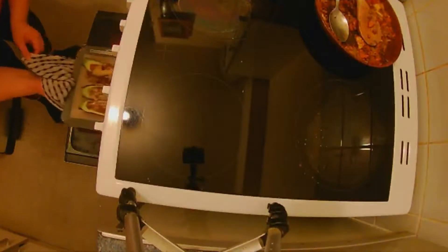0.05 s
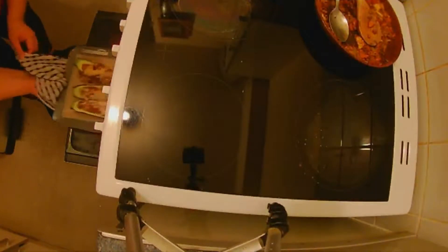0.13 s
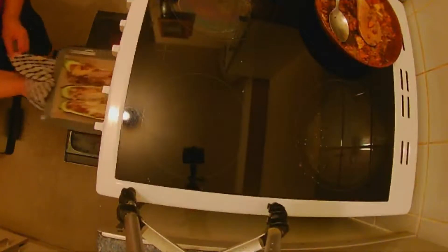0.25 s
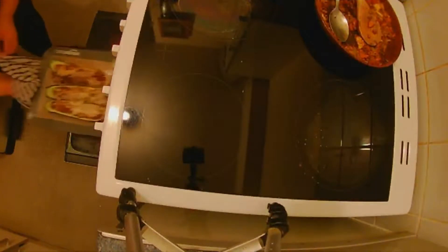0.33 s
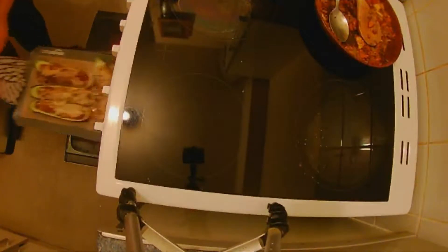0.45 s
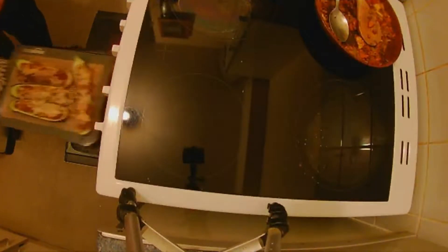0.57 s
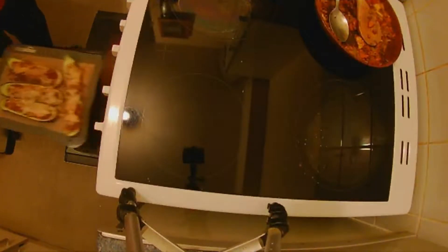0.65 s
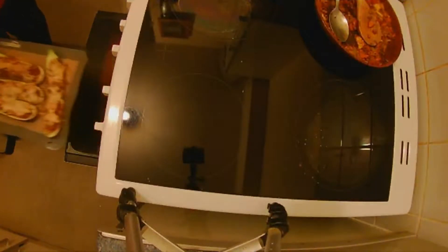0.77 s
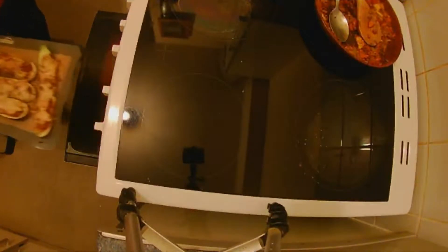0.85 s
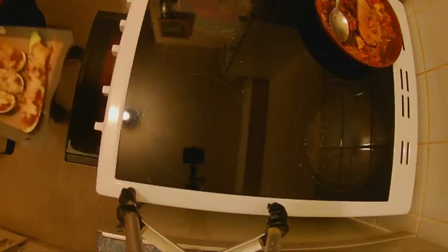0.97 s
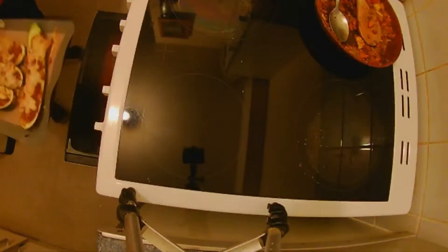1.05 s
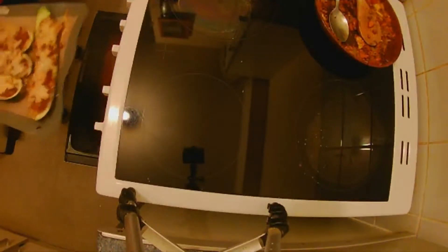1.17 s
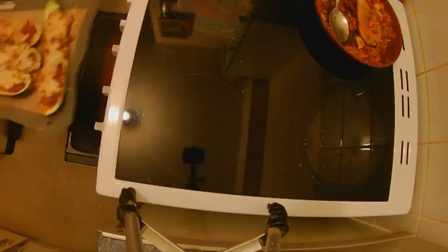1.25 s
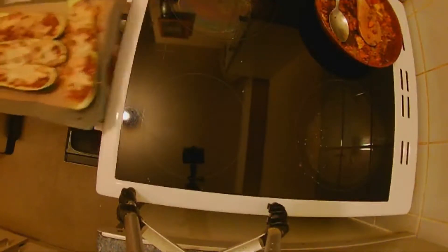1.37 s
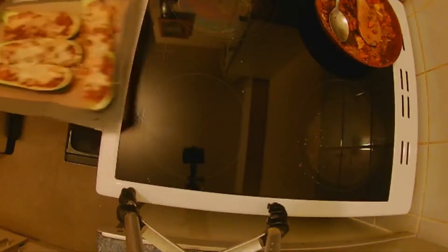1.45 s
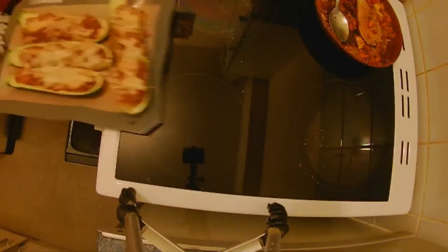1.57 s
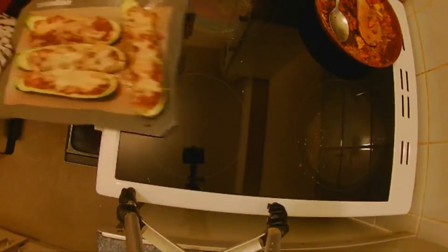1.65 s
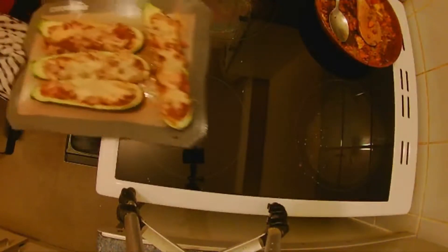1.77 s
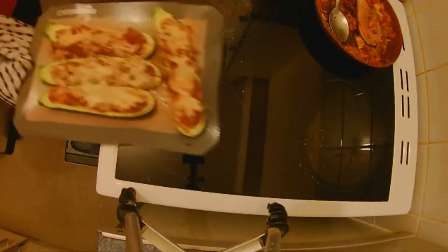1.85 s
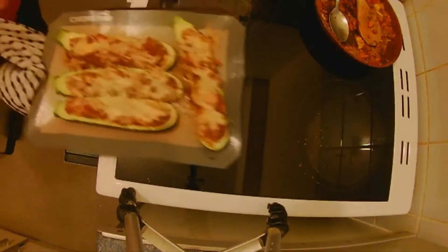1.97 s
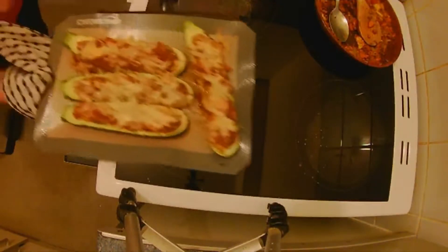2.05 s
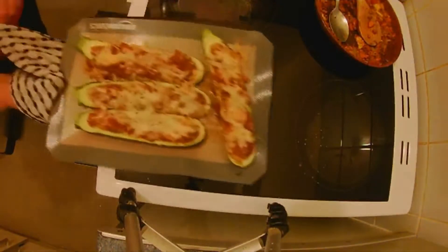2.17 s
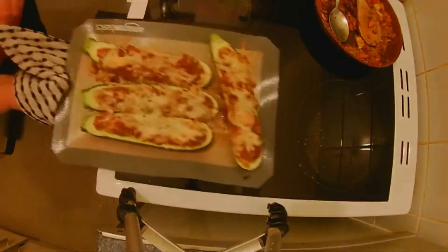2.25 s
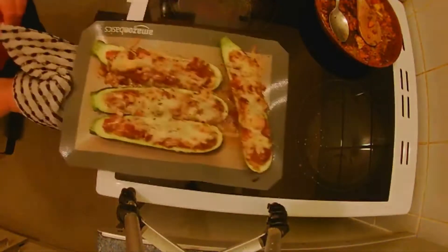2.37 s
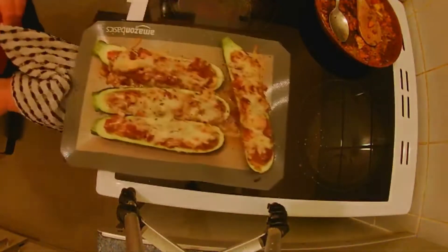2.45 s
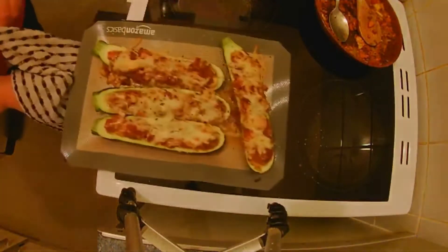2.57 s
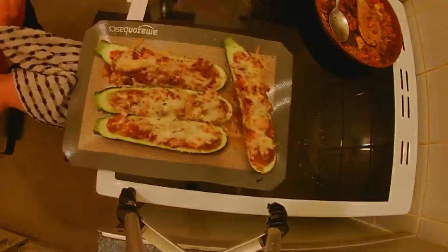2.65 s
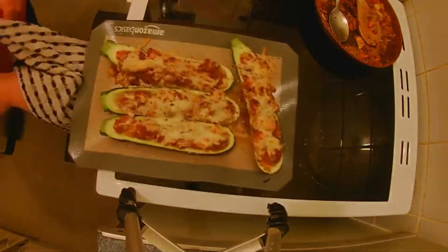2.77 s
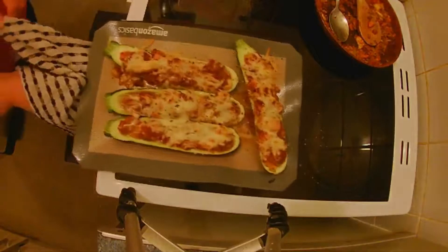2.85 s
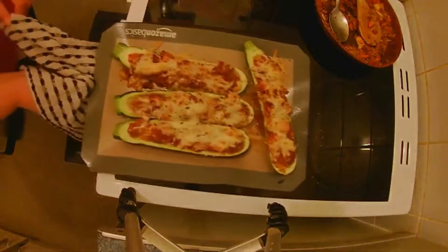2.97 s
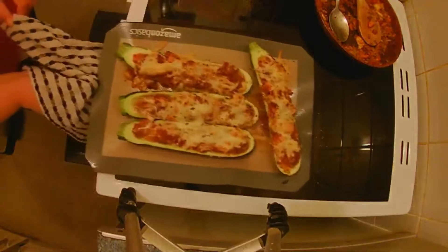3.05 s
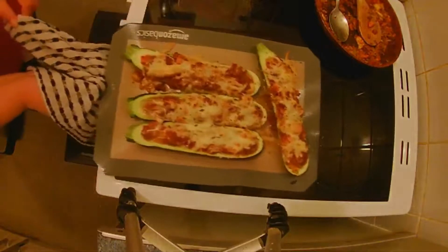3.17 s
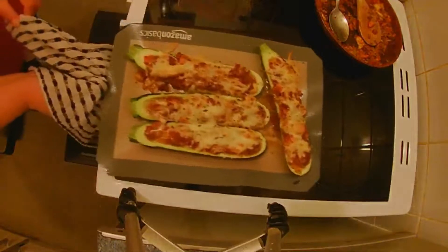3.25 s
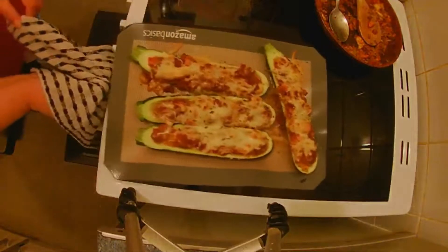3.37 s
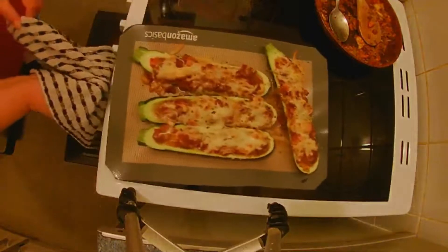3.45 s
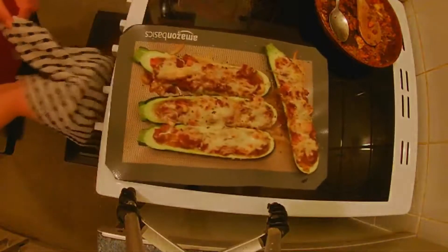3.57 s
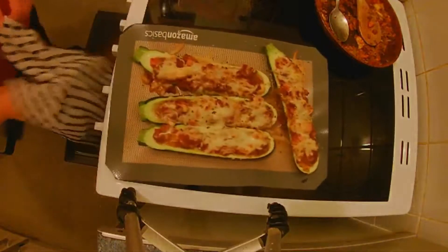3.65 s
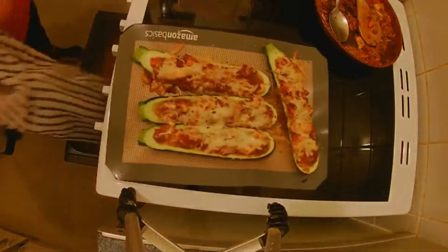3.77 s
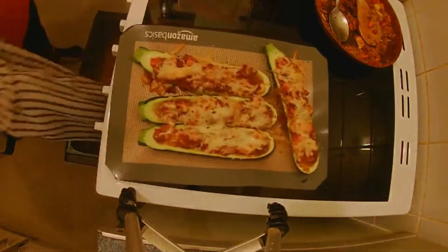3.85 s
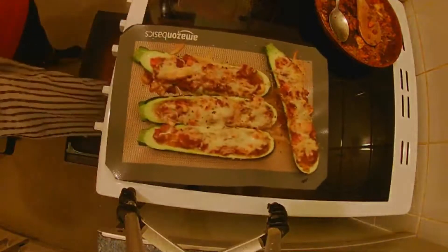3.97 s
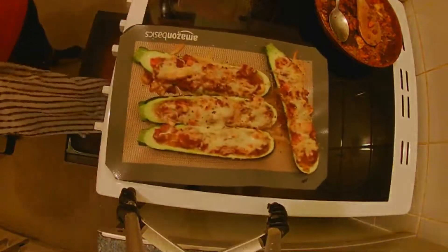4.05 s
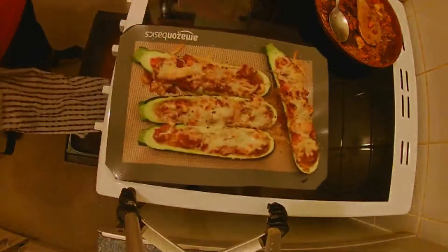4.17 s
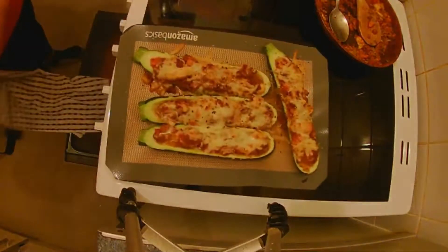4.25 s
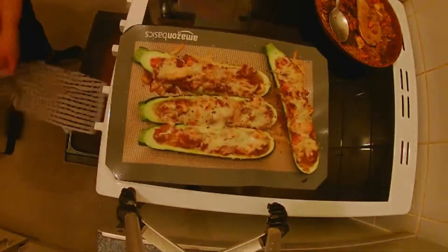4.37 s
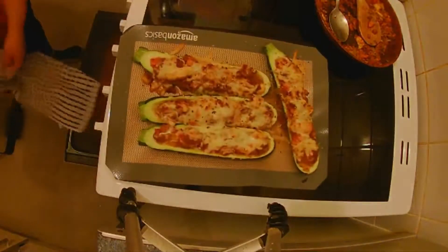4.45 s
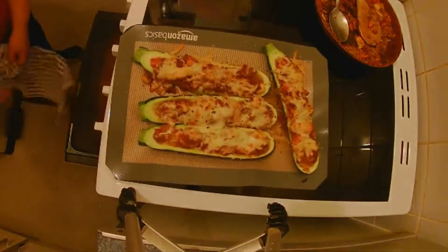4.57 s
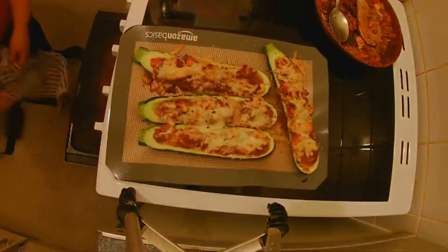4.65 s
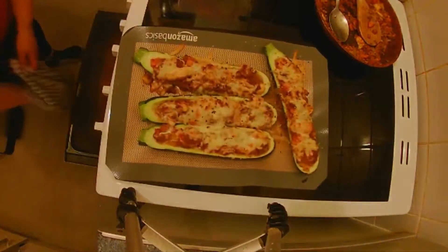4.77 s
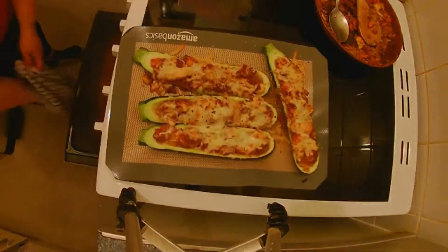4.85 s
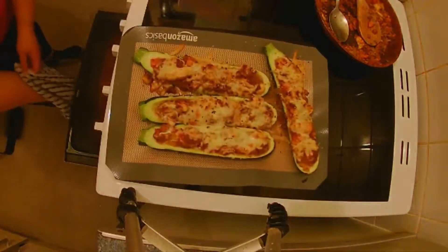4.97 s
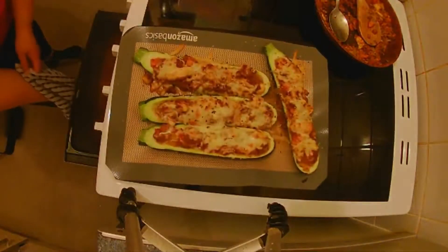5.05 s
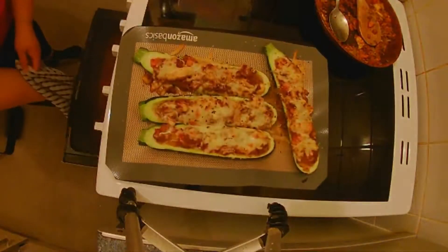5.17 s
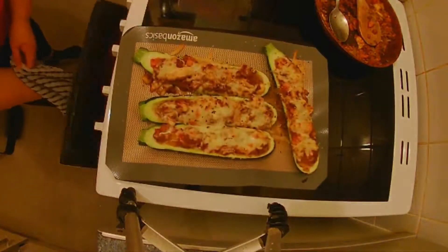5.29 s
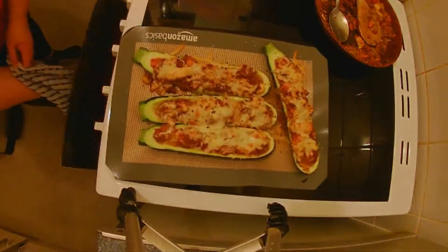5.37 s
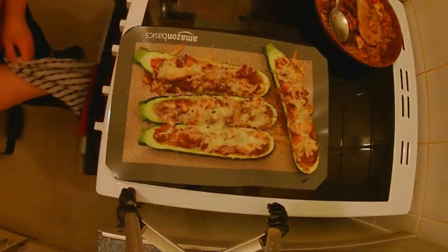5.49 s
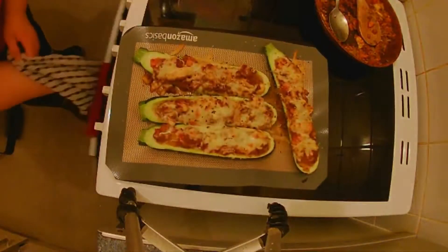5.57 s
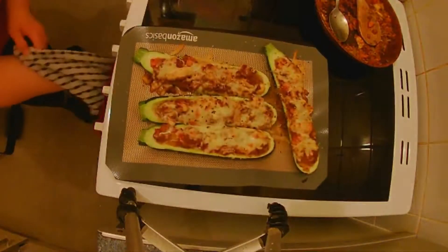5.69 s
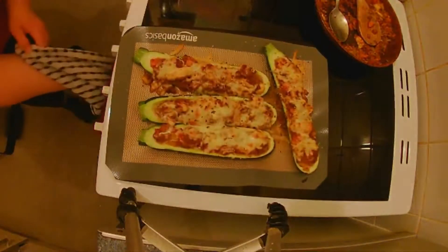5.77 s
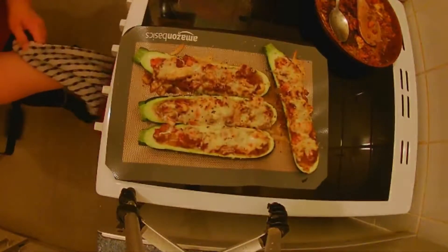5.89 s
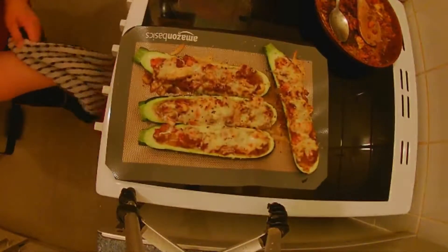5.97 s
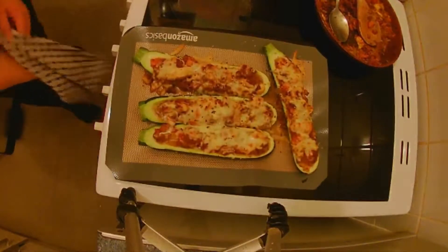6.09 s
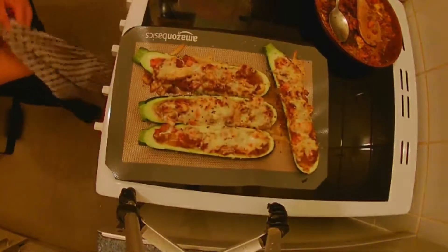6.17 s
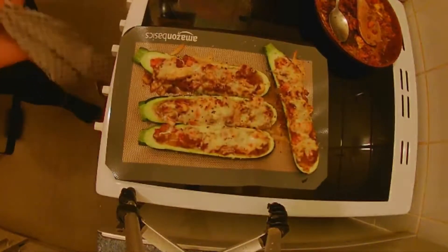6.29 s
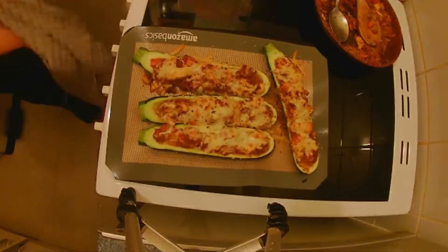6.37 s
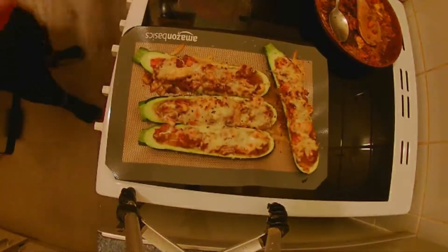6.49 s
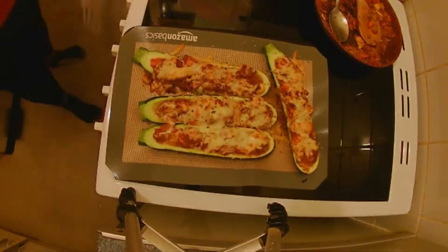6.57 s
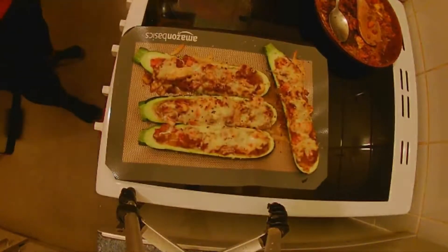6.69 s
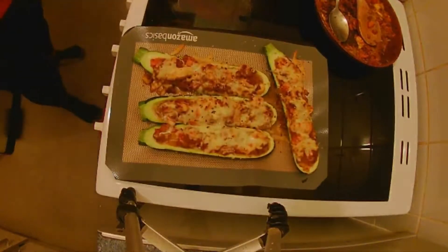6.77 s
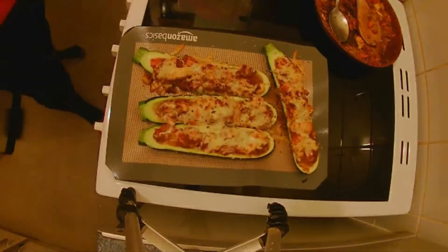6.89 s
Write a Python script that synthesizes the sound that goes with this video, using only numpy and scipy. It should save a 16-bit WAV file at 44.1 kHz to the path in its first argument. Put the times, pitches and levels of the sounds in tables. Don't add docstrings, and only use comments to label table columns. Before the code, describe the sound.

A small tiled kitchen, heard close to the cooker. Oven fan noise and low mains hum continue throughout, with a soft hiss of hot food and a faint clock tick about once a second from 0.16 s. Tiny fat spits crackle in the first half second and near 1.3-1.4 s, sparsely later. At 1.63 s a loaded steel tray strikes the glass sharply; its rim rings as it scrapes with two gritty strokes from 1.7 to 2.1 s. Several knocks cluster at 2.14-2.38 s, strongest around 2.29 s, with a low cooker thump. Light settling taps and rubs come at 3.1-3.24 s. The sheet snaps at 3.41 s, the loudest event, and pops more softly at 4.81 s. The oven catch clacks at 5.53 s, the door thuds shut at 5.79 s with a ringing, hollow boom, and the rack rattles until 6.1 s. Fan and hum remain, with hiss rising slightly at the end.

```python
import sys
import numpy as np
from scipy import signal
from scipy.fft import rfft, irfft, next_fast_len
from scipy.io import wavfile
from scipy.ndimage import uniform_filter1d, map_coordinates

SR = 44100
rng = np.random.default_rng(int(sys.argv[2]) if len(sys.argv) > 2 else 0)


def how_loud(loudness_db):
    steps = np.asarray(loudness_db, float) / 20
    return 10 ** steps


def generate_wav(sig):
    pcm = np.round(np.clip(np.atleast_2d(sig).T, -1, 1) * 32767).astype(np.int16)
    wavfile.write(sys.argv[1], SR, pcm)


N = 305588

# start in seconds, peak in dB, weight in dB, bite in dB.
KNOCKS = [(1.631, -40, 9, -5), (1.634, -11, 0, -1), (1.709, -26, 13, 4), (1.912, -31, 4, 4),
          (2.138, -32.5, 7, 13), (2.185, -24, 6.5, -20), (2.225, -29, -7, -12), (2.282, -21, -30, 11.5),
          (2.293, -13, 0, -9.5), (2.312, -33, -18, -1), (2.376, -27, 9.5, -9), (3.098, -21.5, -3.5, -10),
          (3.117, -34, -11, -9), (3.198, -40.5, -18, -9), (3.236, -37.5, 5, -12)]
# start in seconds, peak in dB, weight in dB, bite in dB.
POPS = [
    (3.414, -5.5, 3, -2),
    (4.8125, -11, 2.5, 2.5),
]
# start in seconds, peak in dB, weight in dB, bite in dB.
LATCH = [
    (5.534, -19.5, 1, 8),
    (5.542, -24, -3.5, -5),
    (5.559, -24.5, 2, 7),
    (5.589, -31, -1, -5),
    (5.617, -36.5, -4, -25),
]
# start in seconds, peak in dB, weight in dB, bite in dB.
SLAM = [
    (5.79, -19.5, -14, 2.5),
    (5.794, -16, 1.5, 0.5),
    (5.831, -23.5, 8.5, -14),
    (5.861, -33, -3, -13),
]
# start in seconds, peak in dB, weight in dB, bite in dB.
RATTLE = [
    (5.924, -31.5, 9, -15),
    (5.957, -46, 4, -14),
    (5.999, -33, 9, -25),
    (6.033, -46, 2, -10),
    (6.0615, -44, -8, 40),
    (6.074, -35.5, -1, -1),
]
# start in seconds, peak in dB.
RIM_CATCHES = [
    (1.7098, -24),
    (1.9112, -46),
    (2.1862, -32),
]
# start in seconds, peak in dB, bite in dB.
SPITS = [(0.0044, -48, -14), (0.1077, -49.5, -12), (0.3026, -48.5, 2), (0.4767, -46.5, 3), (0.4914, -49, 3),
         (0.5004, -52, 1), (0.5093, -48, 3), (1.2999, -55, -10), (1.3344, -54, 0), (1.441, -57.5, 0),
         (3.7244, -52, 0), (4.3844, -52, 1), (4.3994, -58, 1), (5.4, -56, 4), (4.6, -52, -2)]
TICKS_DB = [-46, -43.5, -46, -51, -45.5, -43, -45]

# start in seconds, length in seconds, rub in dB, weight in dB, bite in dB.
SLIDES = [
    (1.708, 0.22, -50.5, -1, 9),
    (1.918, 0.2, -45.5, 0.5, -1.5),
    (2.127, 0.036, -48.5, 6.5, 13),
    (2.193, 0.066, -50.5, -5, -3),
    (2.276, .006, -40, 1, 14),
    (2.305, 0.12, -53, -7, -3),
    (3.134, 0.075, -53, -11, 4),
    (3.221, 0.06, -56.5, 1, 0),
    (5.457, 0.024, -58.5, 9.5, -15),
]
# start in seconds, carcass boom in dB, pushed air in dB.
PUSHES = [
    (2.29, -41.5, -62),
    (2.37, -52, -58),
    (5.545, -47, -61),
    (5.66, -47, -62),
    (5.827, -39.5, -37.5),
]
# time in seconds, hiss in dB.
STEAM = [(0, -69), (.8, -72), (1.8, -70.5), (2.4, -71), (3.4, -81), (4.13, -75), (4.4, -64.5), (4.6, -72.5),
         (5.7, -81), (6.5, -87), (6.93, -64.5)]

# frequency in Hz, density in dB per Hz.
TRAY_COLOUR = [(47, -21.5), (80, -27), (283, -6.5), (1370, -1.5), (1530, 0.5), (1700, -2.5), (1900, -9),
               (2080, -13.5), (2840, -12.5), (3170, -17.5), (4050, -18), (7870, -36.5), (16000, -35.5)]
BUCKLE_COLOUR = [(47, -44), (80, -26), (242, -10.5), (538, -11.5), (760, -7), (1490, 3), (1740, -5.5),
                 (2130, -12), (2780, -13.5), (3240, -21.5), (4230, -22), (6450, -38.5), (16000, -56)]
CATCH_COLOUR = [(35, -49), (60, -38), (124, -9), (222, -1), (281, -9), (417, -2), (862, -7), (1380, 2.5),
                (1580, -6.5), (1860, -8), (3760, -20), (16000, -54)]
DOOR_COLOUR = [(35, -34), (60, -16), (153, -8.5), (233, -5.5), (882, -6), (1200, -0.5), (1380, -7),
               (1470, 3), (2520, -9.5), (3940, -8.5), (11500, -38.5), (16000, -93)]
RACK_COLOUR = [(300, -42), (700, -24), (1170, -2), (1600, -7), (2500, -20), (4500, -13.5), (8000, -32),
               (16000, -54)]
ESCAPEMENT_COLOUR = [(500, -16), (1200, 15), (1700, -0.5), (2300, 6), (3000, -3.5), (4000, 1.5),
                     (6000, -17), (16000, -53)]
SPIT_COLOUR = [(1000, -40), (3000, -1), (5000, 5), (8000, -7), (12000, -1), (16000, -14)]
FAN_COLOUR = [(15, -8.5), (45, 0), (110, -1.5), (280, -3), (420, -4.5), (560, -4), (900, -7), (1550, -8),
              (2000, -15.5), (3400, -21.5), (4100, -21), (7000, -27), (12000, -29.5), (16000, -35.5)]
# frequency in Hz, density in dB per Hz.
GLASS_COLOUR = [(120, -7.5), (295, -3.5), (380, -18), (465, -3.5), (620, -11.5), (1100, -3.5), (1350, 0),
                (1560, -4), (1780, -11.5), (2400, -14), (3400, -30), (4050, -18), (4700, -30.5),
                (7500, -34)]

# frequency in Hz, level in dB, t60 in seconds.
TRAY_RING = [(301, 2.5, 0.2), (475, 4, 0.13), (717, 0.5, 0.15), (938, 2.5, 0.066), (1080, -4, 0.13),
             (1280, -21, 0.088), (1518, 4.5, 0.042), (1625, -11.5, 0.16), (1790, -34, 0.051)]
BUCKLE_RING = [(934, -12, .09), (1118, -9, .08), (1245, -5, .06), (1382, -9, .06), (1443, -5, .06),
               (1537, -7, .06), (1692, -9, .07), (1766, -8, .08)]
CATCH_RING = [(125.7, -10.5, 0.51), (438, -5, 0.31), (469, 11, 0.087), (673, 0, 0.19), (773, -8.5, 0.26),
              (1118, 2, 0.18), (1330, 3.5, 0.27), (1880, -6, 0.22), (3770, -16.5, 0.28)]
DOOR_RING = [(171, -14.5, 0.19), (1165, -2, 0.19), (1231, -4, 0.26), (1520, -11, 0.19), (1820, -5, 0.27),
             (2356, -15, 0.16), (2656, -4.5, 0.22), (2910, -10, 0.13), (3090, 2, 0.14), (3380, -21, 0.14),
             (3868, -7, .24), (3980, -11, 0.13), (4220, -2, 0.064), (5185, -12, 0.18)]
RACK_RING = [(1200, 0, .028), (1050, -8, .03), (720, -8, .03)]
RIM_RING = [(1508, -0.5, 0.22), (1600, -2.5, 0.15), (1655, -4, 0.11)]
# frequency in Hz, t60 in seconds.
FADE = [(100, 0.5), (400, 0.25), (1400, 0.14), (4000, 0.24), (8000, 0.11), (15000, 0.17)]
# frequency in Hz, level in dB.
HUM = [(25, -67), (50, -57.5), (75, -76), (100, -66.5), (149, -74.5), (242, -66), (393, -72), (4064, -84.5)]
START_DELAY = {"tray": .002, "pop": .0027, "door": .0005}

TREBLE_SHARE = 0.49
TWIN_SPREAD, TWIN_SHARE = 0.015, 0.6


def unit(x):
    return x / np.sqrt(np.mean(x ** 2) + 1e-20)


def along(points, hz):
    f, v = np.transpose(points)
    return np.interp(np.log(hz + 1), np.log(f + 1), v)


def wobble(rate):
    knots = rng.standard_normal(int(N * rate / SR) + 4)
    return map_coordinates(knots, [np.arange(N) * rate / SR])


def filtered(x, response):
    m = next_fast_len(N + SR // 2)
    gain = response(np.fft.rfftfreq(m, 1 / SR))
    return unit(irfft(rfft(x, m) * gain, m)[:N])


def band(lo_hz, hi_hz):
    return lambda f: (f / lo_hz) ** 2 / (1 + (f / lo_hz) ** 2) / (1 + (f / hi_hz) ** 4)


def causal(x, gain_db):
    half = len(x) // 2
    cepstrum = irfft(gain_db * np.log(10) / 20, len(x))
    cepstrum *= np.r_[1, np.full(half - 1, 2), 1, np.zeros(half - 1)]
    return irfft(rfft(x) * np.exp(rfft(cepstrum)), len(x))


def blows(table, colour, ring, ring_db, strike_db, fast, late_db, rise,
          length=1, source="tray", size=16384):
    out = np.zeros(N + SR)
    t, hz = np.arange(size) / SR, np.fft.rfftfreq(size, 1 / SR)
    for start, peak_db, *feel in table:
        weight_db, bite_db = [0, 0, *feel][-2:]
        tilt = [(250, weight_db), (1300, 0.019), (3800, TREBLE_SHARE * bite_db), (11000, bite_db)]

        f, u, z = signal.stft(rng.standard_normal(size), SR, nperseg=128)
        life = along(FADE, f)[:, None] * length
        z = z * (how_loud(-60 * u / (fast * life)) + how_loud(late_db - 60 * u / life))
        wash = signal.istft(z, SR, nperseg=128)[1][:size] * (1 - np.exp(-t / rise))
        wash[0] = how_loud(strike_db)
        hit = unit(causal(wash, along(colour, hz) + along(tilt, hz)))

        for mode_hz, level, t60 in ring:
            mode_db = ring_db + level + along(tilt, mode_hz) + 2 * rng.normal()
            twin_hz = mode_hz * (1 + TWIN_SPREAD * rng.normal())
            pair = np.sin(2 * np.pi * mode_hz * t) + TWIN_SHARE * np.sin(2 * np.pi * twin_hz * t)
            decay = how_loud(mode_db - 60 * t / (t60 * length))
            hit += decay * pair / (1 + TWIN_SHARE) * (1 - np.exp(-2 * t / rise))

        first = round((start + START_DELAY[source]) * SR)
        out[first:][:size] += how_loud(peak_db) * hit / np.abs(hit).max() * (1 - t / t[-1])
    return out[:N]


def tray():
    knocks = blows(KNOCKS, TRAY_COLOUR, TRAY_RING, ring_db=4.5, strike_db=18, fast=0.083,
                   late_db=-5.5, rise=0.001, length=0.94)
    pops = blows(POPS, BUCKLE_COLOUR, BUCKLE_RING, ring_db=14, strike_db=23.5, fast=0.31,
                 late_db=-3.5, rise=0.001, length=1.34, source="pop")
    return knocks + pops


def rubbing(grit_db):
    grip_s, let_go_s, sag_db_per_s = 0.012, 0.025, 22
    song_db, long_stroke_s = -1, 0.2

    def grit():
        return rng.standard_normal(N) * how_loud(grit_db * wobble(150) + 2.3 * wobble(25.58))

    def part(lo_hz, hi_hz):
        return filtered(grit(), lambda f: how_loud(along(GLASS_COLOUR, f)) * band(lo_hz, hi_hz)(f) ** 2)

    body, bass, treble = part(460, 3900), part(110, 970), part(2900, 7300)
    air = filtered(grit(), band(9000, 17000))
    song = filtered(grit(), lambda f: 1 / (1 + ((f - 1560) / 150) ** 2))
    out = np.zeros(N)
    for start, length, rub_db, weight_db, bite_db in SLIDES:
        u = np.arange(N) / SR - start
        stroke = np.clip(np.minimum(u / grip_s, (length + let_go_s - u) / let_go_s), 0, 1)
        stroke *= how_loud(rub_db - sag_db_per_s * np.clip(u, 0, 1))
        sound = body + how_loud(song_db) * length / long_stroke_s * song
        sound += how_loud(weight_db) * bass
        sound += how_loud(-11 + TREBLE_SHARE * bite_db) * treble
        sound += how_loud(-30 + bite_db) * air
        out += stroke * sound
    return out


def rim():
    return blows(RIM_CATCHES, RACK_COLOUR, RIM_RING, ring_db=28, strike_db=11, fast=0.17,
                 late_db=-15, rise=0.00049)


def door():
    catch = blows(LATCH, CATCH_COLOUR, CATCH_RING, ring_db=5.5, strike_db=3, fast=0.34,
                  late_db=-7, rise=0.01, length=1.2, source="door")
    slam = blows(SLAM, DOOR_COLOUR, DOOR_RING, ring_db=13, strike_db=14, fast=0.71,
                 late_db=0, rise=0.0044, length=1.2, source="door")
    rattle = blows(RATTLE, RACK_COLOUR, RACK_RING, ring_db=39, strike_db=-13, fast=0.076,
                   late_db=-33, rise=0.0063, length=0.69, source="door", size=4096)
    return how_loud(-1) * (catch + slam) + rattle


def carcass():
    boom_rise_s, boom_t60, air_rise_s, air_t60 = 0.0042, 0.41, 0.041, 0.63
    air = filtered(rng.standard_normal(N), lambda f: band(22, 55)(f) ** 2)
    boom = filtered(rng.standard_normal(N), lambda f: band(80, 180)(f) ** 2)

    def swell(u, db, rise, t60):
        return how_loud(db - 60 * u / t60) * (1 - np.exp(-u / rise))

    out = np.zeros(N)
    for start, boom_db, air_db in PUSHES:
        since = np.clip(np.arange(N) / SR - start, 0, None)
        out += swell(since, boom_db, boom_rise_s, boom_t60) * boom
        out += swell(since, air_db, air_rise_s, air_t60) * air
    return out


def spitting_fat():
    return blows(SPITS, SPIT_COLOUR, [], ring_db=0, strike_db=4.5, fast=0.061,
                 late_db=-7, rise=0.0004, size=4096)


def clock():
    first_tick_s, period_s = 0.158, 0.9996
    ticks = [(first_tick_s + k * period_s, db) for k, db in enumerate(TICKS_DB)]
    return blows(ticks, ESCAPEMENT_COLOUR, [], ring_db=0, strike_db=-6, fast=0.5,
                 late_db=-2, rise=0.0064, size=8192)


def kitchen():
    fan_db, whine_hz, whine_db = -55, 13750, -93.5
    t = np.arange(N) / SR
    z = signal.stft(rng.standard_normal((2, N)), nperseg=512)[2]
    field = rng.standard_normal(z.shape[1:])
    field = uniform_filter1d(uniform_filter1d(field, 6, 0), 12, 1)
    fan, hiss = signal.istft(z * how_loud(1.2 * unit(field)), nperseg=512)[1][:, :N]
    fan = filtered(fan, lambda f: how_loud(along(FAN_COLOUR, f)))
    hiss = filtered(hiss, lambda f: band(3000, 6000)(f) ** 2)
    hiss_db = np.interp(t, *np.transpose(STEAM))
    out = how_loud(fan_db) * fan + how_loud(hiss_db) * hiss
    for hz, db in [*HUM, (whine_hz, whine_db)]:
        level = how_loud(db + 2.5 + 0.23 * wobble(4.7))
        out += level * np.sin(2 * np.pi * hz * t + 1.02 * wobble(7.6))
    return out


def scene():
    cooker = tray() + rubbing(grit_db=0.8) + rim() + door() + carcass()
    return (cooker + spitting_fat() + clock() + kitchen())[None]


def roll_off(x):
    return signal.sosfilt(signal.butter(12, 15750, fs=SR, output="sos"), x)


def record(dry):
    top_hz = 15750
    mix = irfft(rfft(dry) * (np.fft.rfftfreq(N, 1 / SR) < top_hz), N)
    return roll_off(mix)


dry = scene()
out = record(dry)
generate_wav(out)
```